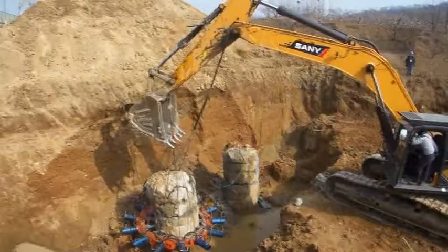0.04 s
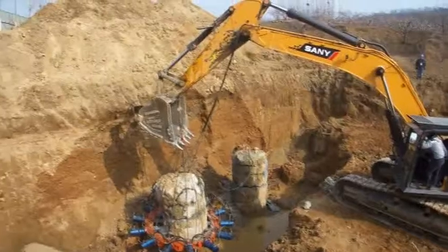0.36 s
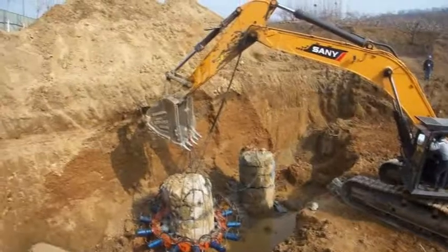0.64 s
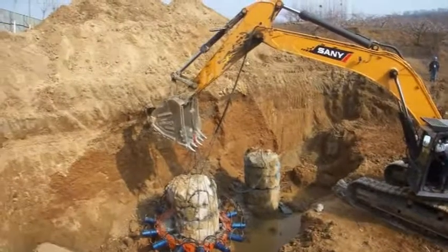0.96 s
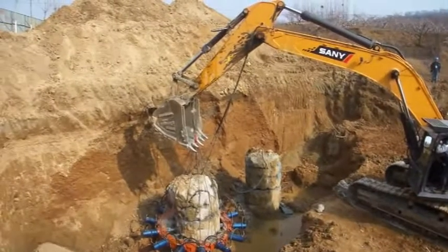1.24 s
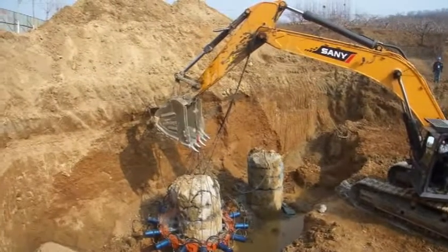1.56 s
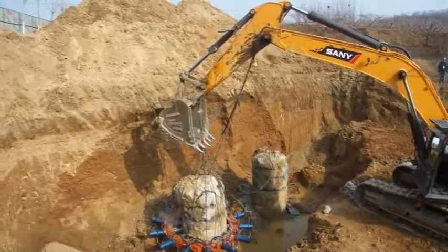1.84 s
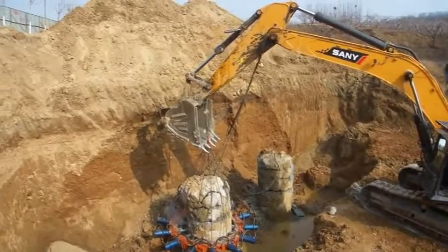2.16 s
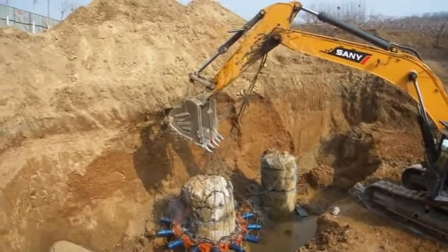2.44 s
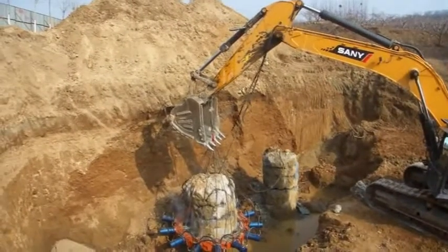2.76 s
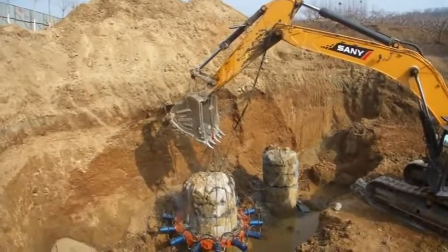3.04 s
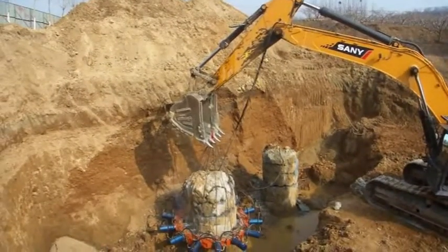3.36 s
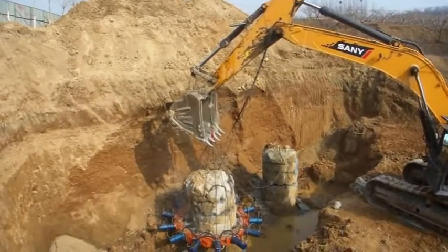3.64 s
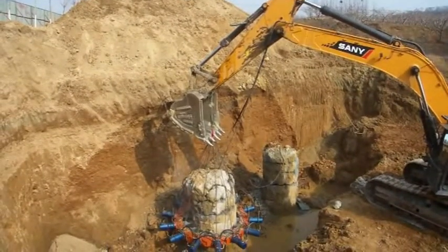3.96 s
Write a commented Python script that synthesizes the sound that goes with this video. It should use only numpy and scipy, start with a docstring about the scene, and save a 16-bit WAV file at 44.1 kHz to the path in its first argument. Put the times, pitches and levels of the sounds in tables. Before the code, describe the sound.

An excavator's diesel rumbles steadily, with sharp cracks of breaking concrete and wind gusts.

```python
"""In an earth pit, a little right of the microphone, an excavator drives a hydraulic pile breaker.
Its diesel drones and clatters, the piston pump whines and oil hisses. From 0.2 s the concrete pile ticks
and crunches under the chisels, the steel collar rings and the earth walls return a short echo. From 0.5 s
chains clank on the collar and gusts buffet the microphone. At 2.6 s the pile splits with a thud,
the load comes off and the engine picks up speed under a few last cracks."""
import sys
import numpy as np
from scipy import signal
from scipy.fft import rfft, irfft
from scipy.io import wavfile
from scipy.ndimage import uniform_filter1d, minimum_filter1d

SR = 44100
rng = np.random.default_rng(int(sys.argv[2]) if len(sys.argv) > 2 else 0)


def to_wav(sig):
    """Store sig (one row per channel, or 1-D mono) as 16-bit WAV at the path in sys.argv[1].

    Samples outside -1..1 are clipped; the rate is SR.
    """
    pcm = np.clip(np.atleast_2d(sig), -1, 1) * 32767
    pcm = np.round(pcm).astype(np.int16)
    wavfile.write(sys.argv[1], SR, pcm.T)  # frames by channels


N = 176400
T, FREQS = np.arange(N) / SR, np.maximum(np.arange(N // 2 + 1) * SR / N, 1)

# engine speed: time_s, firing_hz
ENGINE_SPEED = [(0.1, 73.9), (.6, 73.7), (1.0, 73.2), (1.5, 72.7), (2.3, 72.3), (2.6, 72.0), (2.76, 75.0),
                (2.92, 76.8), (3.15, 77.4), (4.0, 77.8)]
# exhaust tones: firing_multiple, loaded_db, free_db
EXHAUST_TONES = [(1, -37.5, -38), (2, -42, -31.5), (5, -43, -36.5), (7, -52, -40), (11, -43.5, -36),
                 (15, -39, -38), (21, -40.5, -39.5), (23, -38.5, -39)]
# harmonics of the pump: time_s, first_db, second_db, third_db, fourth_db
PUMP_LEVELS = [(.1, -29.5, -28, -36, -20.5), (.48, -23, -27.5, -32, -22.5), (.58, -25, -26.5, -36, -37),
               (.72, -39, -30, -39.5, -33.5), (1.3, -28.5, -28, -35, -31.5), (1.9, -41, -23.5, -33, -34.5),
               (2.6, -27, -24.5, -42, -39), (2.68, -24, -33, -30, -28.5), (2.75, -16.5, -25, -34, -35),
               (2.9, -15, -30.5, -28, -38), (3.07, -21.5, -37, -33.5, -35), (3.2, -19, -48, -35.5, -45),
               (4.0, -17, -29, -27.5, -31)]
# resonances of covers and boom: pitch_hz, width_hz, level_db
PANEL_MODES = [(187, 48, -27.5), (279, 33, -34.5), (314, 27, -36.5), (358, 18, -35), (515.7, 23, -36),
               (1154, 59, -36.5), (1521, 18, -37), (1677, 6.8, -39), (3000, 43, -48)]
# spectrum of the machine noise common to both channels: frequency_hz, relative_db
MACHINE_SPECTRUM = [(15, -52.5), (25, -27), (42, -27), (70, -18), (102, -13.5), (215, -2.5), (264, -5.5),
                    (404, -8.5), (436, -11), (560, -12), (684, -12), (815, -15), (879, -11.5),
                    (1280, -13.5), (3080, -23), (9280, -37), (10000, -46), (13000, -76), (22000, -120)]
# its stereo width, side against mid: frequency_hz, side_db
MACHINE_WIDTH = [(60, -6), (110, -18), (200, -32), (380, -16.5), (700, -14), (1290, -11), (2380, -7),
                 (4400, -4.5), (8120, -6), (15000, 5.5)]
# its four bands, each heard as a swing about its mean: time_s, rumble_db, clatter_db, hiss_db, treble_db
MACHINE_SWINGS = [(0.1, -18.5, -16.3, -25, -42.5), (0.3, -20.5, -19, -27, -41.5),
                  (0.5, -19, -16.5, -27.5, -42.5), (0.64, -20, -20.5, -27.5, -43),
                  (0.69, -28.5, -24.5, -33, -48.5), (0.82, -21, -23.5, -31, -54),
                  (0.89, -23, -23, -29, -40.5), (1.08, -20, -16.5, -25.5, -39),
                  (1.22, -18, -23.5, -28.5, -43.5), (1.29, -23, -24, -28.5, -47.5),
                  (1.48, -17, -18, -25, -38), (1.75, -17.5, -17.3, -25.3, -41.5),
                  (2.0, -20, -18.5, -24.5, -44), (2.3, -19, -17, -25.5, -44),
                  (2.56, -19, -19, -26.0, -44.5), (2.72, -20.5, -20, -29, -39),
                  (2.95, -23, -18.5, -30, -45.5), (3.09, -23.5, -22.5, -28.5, -39),
                  (3.3, -20, -18.5, -28.5, -36), (3.62, -19.5, -18, -26, -34),
                  (3.8, -17.5, -18.5, -28.5, -37.5), (3.99, -19.5, -17.5, -29, -39)]
# cracks in the pile: start_s, level_db, centre_hz, width_octaves, rise_s, decay_s
PILE_CRACKS = [(0.195, -18.5, 4530, 0.66, .0008, 0.013), (.510, -12, 2830, 0.13, 0.0034, 0.0094),
               (0.537, -8.5, 3400, 0.19, 0.002, 0.0044), (.610, -13, 7500, 0.9, .0005, 0.0033),
               (0.8509, -6, 2880, 0.76, 0.0012, 0.0045), (.885, -20, 2410, 0.6, 0.0025, 0.016),
               (1.423, -18, 4160, 1.5, 0.0017, 0.0093), (1.522, -18, 7000, 1.4, .002, 0.0071),
               (1.702, -18.5, 5000, 1.9, 0.0022, 0.0075), (1.863, -20, 5040, 1.3, .004, 0.015),
               (1.892, -16.5, 4400, 1.1, .002, 0.0062), (1.955, -28.5, 6000, 1.4, .004, 0.034),
               (2.002, -15.5, 5900, .55, 0.0023, 0.0093), (2.013, -18, 6500, 1.3, .002, 0.0072),
               (2.050, -5, 1400, 0.66, 0.0071, 0.016), (2.12, -26.5, 6000, 1.2, .008, 0.02),
               (2.383, -11, 2650, 0.7, 0.012, 0.028), (2.410, -14.5, 4500, 0.92, 0.0077, 0.013),
               (2.432, -21, 7000, 1.5, 0.003, 0.011), (2.615, -3.5, 2000, 1.5, 0.0005, 0.007),
               (2.62, -11, 1700, 0.8, 0.00076, 0.0068), (2.629, -14.5, 2500, 1.2, 0.0018, 0.008),
               (2.644, -20.5, 2450, 0.35, 0.0027, 0.037), (3.236, -15, 3160, 0.42, .001, 0.0056),
               (3.248, -9, 3000, 0.61, 0.00053, 0.0025), (3.337, -19, 2900, 1.5, 0.0027, 0.0096),
               (3.386, -9.5, 3900, 0.68, 0.00055, 0.0029), (3.418, -18.5, 7750, 0.14, 0.00063, 0.0037),
               (3.626, -17, 5360, 0.78, 0.00066, 0.0033), (3.693, -13, 3100, 0.26, .002, 0.0046)]
# resonances of the steel collar: pitch_hz, relative_db
COLLAR_MODES = [(1776, -3), (2062, -3.5), (2350, -1), (2666, -4), (2735, 1), (3080, -2.5), (3420, -4),
                (3670, -6), (4520, -5), (5545, -2)]
# blows on the collar: start_s, level_db, centre_hz, t60_s
COLLAR_BLOWS = [(0.511, -17, 3050, .06), (0.853, -11, 1900, .07), (1.427, -14, 3420, .05),
                (2.052, -16, 2980, .07), (2.388, -27, 2400, .1), (2.616, -12, 2320, 0.054),
                (2.646, -23, 2600, .08), (2.664, -21, 2720, .09), (2.684, -22.5, 2740, 0.095),
                (3.237, -19, 3700, 0.056), (3.338, -23, 2700, .06)]
# gusts at the microphone: time_s, level_db
WIND_GUSTS = [(.54, -40), (.66, -11.5), (.71, -23), (.82, -16.5), (.94, -27), (1.0, -18.5), (1.04, -35),
              (1.1, -21), (1.26, -14), (1.32, -22.5), (1.5, -27), (1.63, -43), (2.03, -42), (2.13, -26),
              (2.22, -39), (2.44, -28), (2.49, -46), (2.54, -16), (2.6, -35), (2.7, -18.5), (2.8, -35),
              (2.88, -24), (3.01, -32), (3.07, -11), (3.17, -39), (3.8, -37), (3.95, -29)]
# spectrum of the buffeting: frequency_hz, relative_db
WIND_SPECTRUM = [(20, -26), (50, -15.5), (85, -2), (170, 1), (300, -3), (450, -11), (700, -18.5),
                 (1500, -35), (5000, -67)]
# jolts of the pile: start_s, level_db, pitch_hz, decay_s
PILE_THUDS = [(0.659, -10.5, 259, 0.0086), (2.6131, -9.5, 285, 0.023), (2.625, -9.5, 146, 0.029)]


def undb(db):
    return 10 ** (np.asarray(db) / 20)


def unit(x):
    return x / np.sqrt(np.mean(x ** 2) + 1e-18)


def curve(rows, column=1):
    """One column of a table, joined by straight lines in time."""
    rows = np.array(rows)
    return np.interp(T, rows[:, 0], rows[:, column])


def colour(rows):
    """Gain at every frequency from rows of frequency_hz, level_db."""
    hz, db = np.array(rows).T
    return undb(np.interp(np.log(FREQS), np.log(hz), db))


def shape(x, gain):
    return irfft(rfft(x) * gain, N)


def hump(hz, octaves):
    """A broad resonance on a log-frequency axis."""
    return 1 / (1 + (np.log2(FREQS / hz) / octaves) ** 2 / 2) ** 2


def noise():
    return rng.standard_normal(N)


def walk(rate_hz):
    """A smooth random wander of unit RMS, without extreme swings."""
    hold = int(SR / rate_hz)
    steps = np.repeat(np.clip(rng.standard_normal(N // hold + 1), -1, 1), hold)
    return unit(uniform_filter1d(uniform_filter1d(steps, hold), hold)[:N])


def stereo(mid, side):
    return np.array([mid + side, mid - side])


def burst(start_s, rise_s, decay_s):
    """A quick rise and an exponential fall."""
    age = np.maximum(T - start_s, 0)
    return (1 - np.exp(-age / rise_s)) * np.exp(-np.minimum(age / decay_s, 40))


def grains(per_s, spread_db):
    """Random clicks of very unequal size."""
    clicks = (rng.random(N) < per_s / SR) * np.sign(noise())
    return unit(clicks * undb(spread_db * np.clip(noise(), -2, 2)))


def tone(cycles):
    """A sine of unit RMS with a random starting phase."""
    return np.sqrt(2) * np.sin(2 * np.pi * (cycles + rng.random()))


def exhaust_drone(firings):
    """Harmonics of the firing rate; their balance shifts as the load comes off and the speed rises."""
    speed = curve(ENGINE_SPEED)
    freedom = (speed - speed.min()) / np.ptp(speed)
    return sum(undb(loaded_db + freedom * (free_db - loaded_db) + 1.7 * walk(13)) * tone(multiple * firings)
               for multiple, loaded_db, free_db in EXHAUST_TONES)


def pump_whine(firings, pulses_per_firing=3):
    """The piston pump whines in step with the crankshaft, leaning slightly left."""
    whine = sum(undb(curve(PUMP_LEVELS, k) + 0.7 * walk(20)) * tone(k * pulses_per_firing * firings)
                for k in range(1, 5))
    return whine * undb([[.5], [-.5]])


def panel_ring():
    """Covers and boom ring with the engine's shaking."""
    return sum(undb(db) * unit(shape(noise(), 1 / (1 + (2 * (FREQS - hz) / width_hz) ** 2)))
               for hz, width_hz, db in PANEL_MODES)


def machine_noise(firings, knock_spread_db=4, flicker_db=1.35):
    """Exhaust rumble, diesel clatter and the hiss of oil in the valves, pulsing with every firing."""
    strengths = undb(knock_spread_db * np.clip(rng.standard_normal(N // 100), -2, 2))
    knock = unit(strengths[firings.astype(int)] * np.exp(-(firings % 1) / 1.3))
    hiss_top = [(10000, -42.5), (15000, -48.5)]  # frequency_hz, relative_db
    spectrum = colour([row for row in MACHINE_SPECTRUM if row[0] < 9500] + hiss_top)
    spectrum = unit(spectrum) * undb(-17.5)
    lowpasses = [1 / (1 + (FREQS / edge_hz) ** 6) for edge_hz in (400, 2200, 6000)]
    shares = np.diff(lowpasses, axis=0, prepend=0, append=1)  # rumble, clatter, hiss, treble
    trims_db, knock_depths = (0, -.5, 3, -1), (.15, .21, .25, .15)
    out = 0
    for column, (share, trim_db, depth) in enumerate(zip(shares, trims_db, knock_depths), 1):
        gain = spectrum * np.sqrt(np.abs(share))
        band = stereo(shape(noise(), gain), shape(noise(), gain * colour(MACHINE_WIDTH)))
        swing_db = curve(MACHINE_SWINGS, column)
        level = undb(swing_db - swing_db.mean() + trim_db + flicker_db * walk(22.26))
        out += band * level * unit(1 - depth + depth * knock)
    return out


def loose_grit(level_db=-44.5, centre_hz=4630):
    """Loose grit ticks faintly throughout, spread wide across the microphone."""
    mid, side = (unit(shape(grains(per_s=52, spread_db=3.3), hump(centre_hz, 0.33))) for _ in range(2))
    return undb(level_db) * stereo(mid, side)


def concrete_cracks(trim_db=0.5):
    """Each crack under the chisels is a dying run of tiny fractures."""
    out = 0
    for start_s, db, hz, octaves, rise_s, decay_s in PILE_CRACKS:
        envelope = undb(db + trim_db) * burst(start_s, rise_s, decay_s)
        mid, side = (grains(per_s=9000, spread_db=4.5) for _ in range(2))
        out += shape(stereo(mid, 0.17 * side) * envelope, unit(hump(hz, octaves)))
    return out


def collar_response(t60_s):
    """Spectrum of the steel collar's modes dying away after one tap."""
    modes = sum(undb(db) * np.sin(2 * np.pi * hz * T) for hz, db in COLLAR_MODES)
    return rfft(modes * burst(0, 0.00019, t60_s / np.log(1000)))


def collar_ring(concrete, level_db=-17.5):
    """The clamped steel rings briefly after each crack."""
    steel = collar_response(t60_s=0.14)
    return undb(level_db) * shape(concrete, steel / np.sqrt(np.mean(np.abs(steel) ** 2)))


def pit_echo(source, level_db=-14, delay_s=0.019, t60_s=0.19):
    """Earth walls scatter a short echo, different on each side of the microphone."""
    walls = rng.standard_normal((2, N)) * burst(delay_s, 0.0015, t60_s / np.log(1000))
    walls /= np.sqrt(np.sum(walls ** 2) / 2)
    return undb(level_db) * signal.fftconvolve(source, walls, axes=1)[:, :N]


def chain_clanks(width_octaves=0.29):
    """Chains and chisels strike the collar; each blow favours the modes around one frequency."""
    spectrum = 0
    for start_s, db, hz, t60_s in COLLAR_BLOWS:
        delay = np.exp(-2j * np.pi * FREQS * start_s)
        spectrum += undb(db) * collar_response(t60_s) * hump(hz, width_octaves) * delay
    return irfft(spectrum, N)


def wind_buffets(common_db=-7, trim_db=-0.5, flutter_db=0.5):
    """Gusts buffet the microphone, mostly as a pressure difference between its two ports."""
    common, across = (unit(shape(noise(), colour(WIND_SPECTRUM))) for _ in range(2))
    level = undb(curve(WIND_GUSTS) + trim_db + flutter_db * walk(45))
    return stereo(undb(common_db) * common, across) * level


def pile_thuds(rubble_db=-3.5):
    """Low jolts as the pile and the heavy collar shift: a short deep ring and a rumble of rubble."""
    out = 0
    for start_s, db, hz, decay_s in PILE_THUDS:
        ring = np.sqrt(2) * np.sin(2 * np.pi * hz * (T - start_s))
        mid, side = (undb(rubble_db) * unit(shape(noise(), hump(hz, 0.64))) for _ in range(2))
        out += undb(db) * burst(start_s, 0.0018, decay_s) * stereo(ring + mid, 0.26 * side)
    return out


def from_the_right(source, treble_db=1.25, lead_s=.000045):
    """A source right of the microphone arrives a little earlier and brighter on that side."""
    sides = np.array([[-.5], [.5]])
    tilt = undb(treble_db * FREQS / (FREQS + 1200) * sides)
    return shape(source, tilt * np.exp(2j * np.pi * FREQS * lead_s * sides))


def scene():
    """At the microphone: the excavator to the right, the breaking pile ahead with its echo, and wind."""
    firings = np.cumsum(curve(ENGINE_SPEED) * (1 + 0.001946 * walk(12))) / SR  # running count
    excavator = pump_whine(firings) + exhaust_drone(firings) + panel_ring() + machine_noise(firings)
    concrete = concrete_cracks() + loose_grit()
    pile = concrete + collar_ring(concrete) + chain_clanks() + pile_thuds()
    return from_the_right(excavator) + pile + pit_echo(pile) + wind_buffets()


def record(dry, start_s=.095, edge_hz=9830, shelf_db=-22, ceiling=.99, limiter_s=.0015, top_hz=15700):
    """The high treble is lost, the sound cuts in abruptly and a fast limiter holds the loudest cracks."""
    shelf = undb(shelf_db) + (1 - undb(shelf_db)) / (1 + (FREQS / edge_hz) ** 40)
    heard = shape(dry, shelf) * np.clip((T - start_s) / 0.0021, undb(-87), 1)
    window = int(limiter_s * SR)
    gain = ceiling / np.maximum(np.abs(heard).max(axis=0), ceiling)
    heard *= uniform_filter1d(minimum_filter1d(gain, window), window)
    return signal.sosfilt(signal.ellip(8, .2, 70, top_hz, fs=SR, output="sos"), heard)


dry = scene()
out = record(dry)
to_wav(out)
```